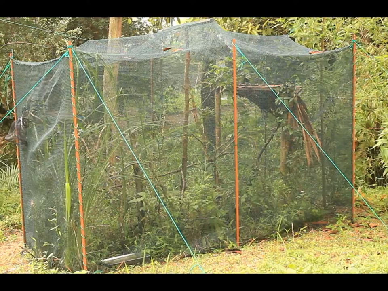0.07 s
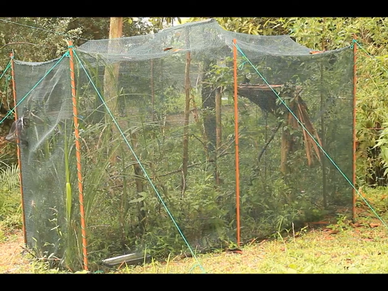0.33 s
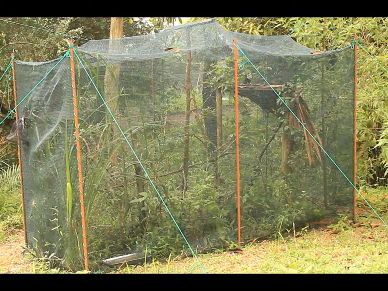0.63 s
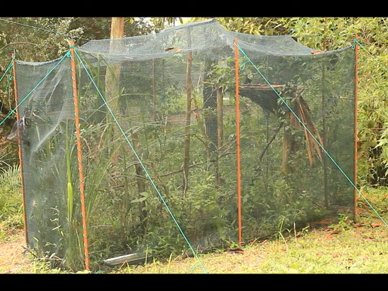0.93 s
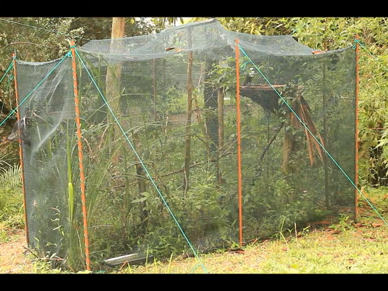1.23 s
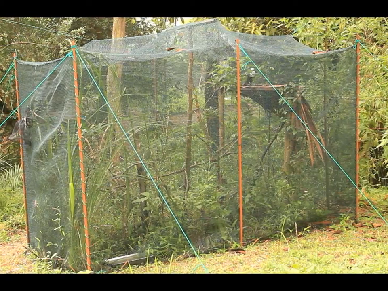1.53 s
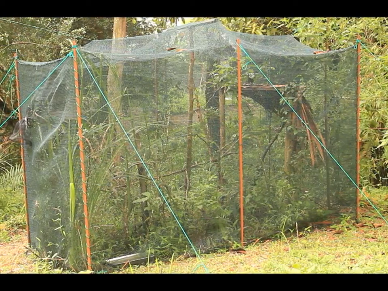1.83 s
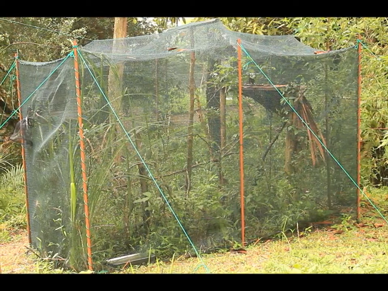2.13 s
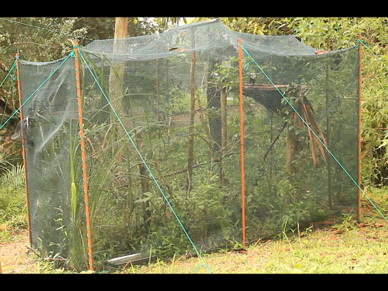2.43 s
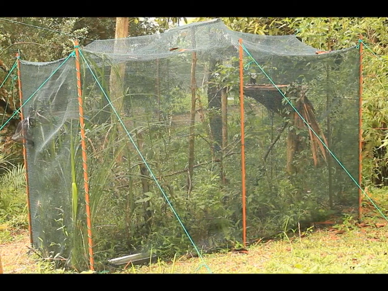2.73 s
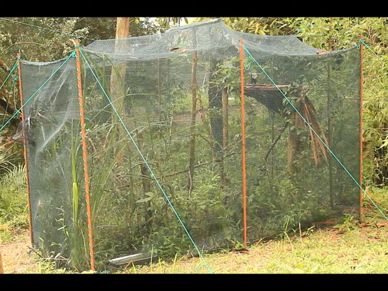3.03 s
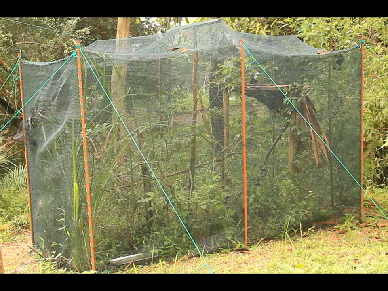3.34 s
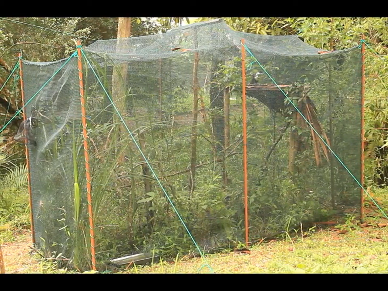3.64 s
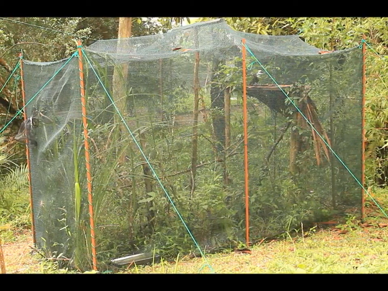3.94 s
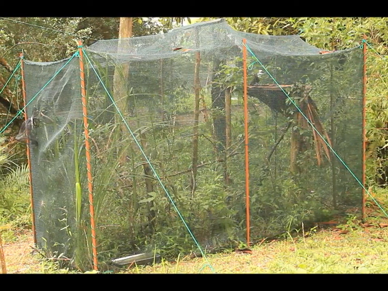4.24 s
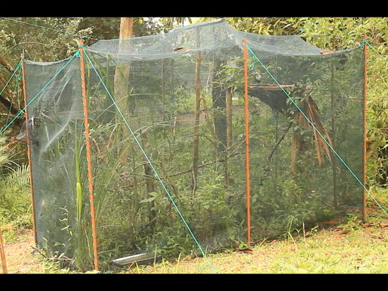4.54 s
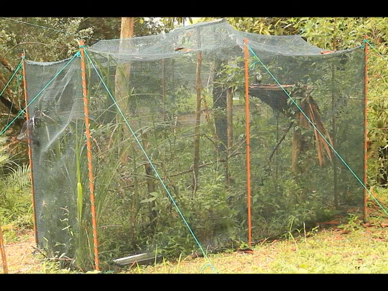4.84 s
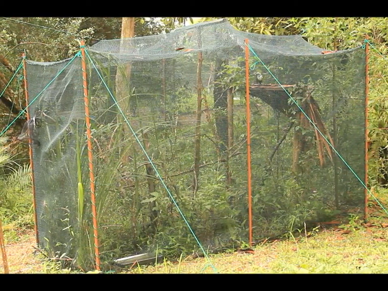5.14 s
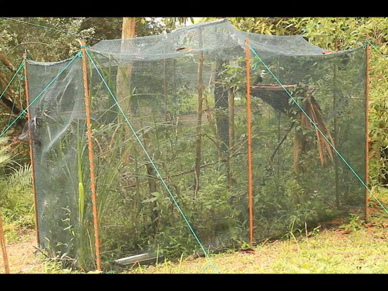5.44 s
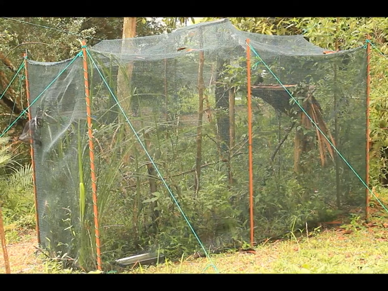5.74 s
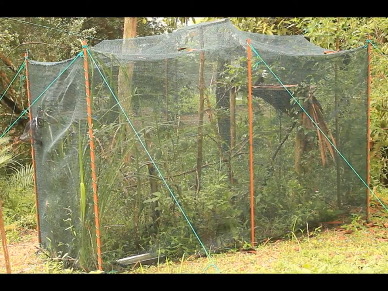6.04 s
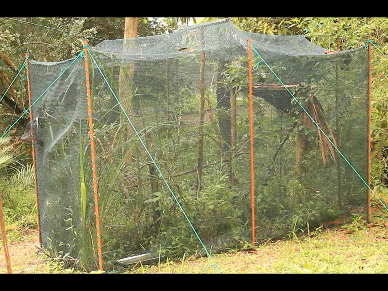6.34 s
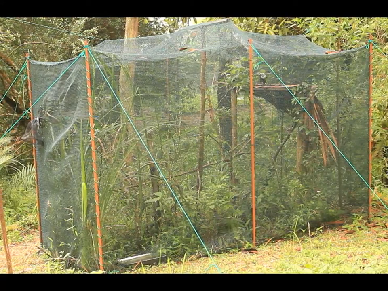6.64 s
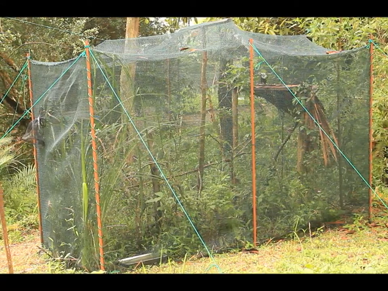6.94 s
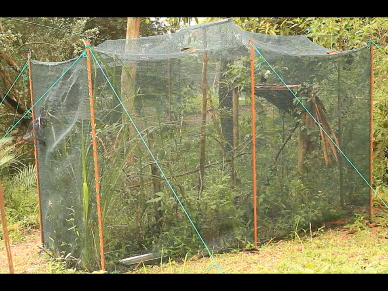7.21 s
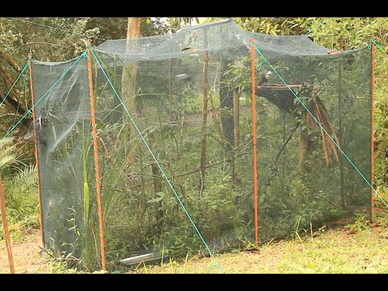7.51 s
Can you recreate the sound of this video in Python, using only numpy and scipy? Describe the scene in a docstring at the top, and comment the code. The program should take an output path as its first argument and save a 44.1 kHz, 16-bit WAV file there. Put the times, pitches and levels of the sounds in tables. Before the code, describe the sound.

Harsh, rattling bird chatter comes in repeated bursts from a few metres off, soon joined by loud runs of short, clear whistles. Partway through, one bird squawks hoarsely, then the chatter and whistles pick up again. Faint nasal mews come from farther birds. Behind it all are a thin insect hiss, a soft rush of air and a faint low hum.

```python
"""In a netted garden aviary, laughingthrushes call a few metres away.
Each bird makes a tone in its voice box (the syrinx), and its throat picks which harmonics are loud.
Rattling trains of harsh, falling notes overlap loud, short whistles; farther birds mew.
There are two hoarse squawks, and a soft thump as a bird shifts on its perch.
The ground and bushes throw the calls back, over soft air noise, an insect hiss and a low hum."""
import sys
import numpy as np
from scipy import signal
from scipy.fft import rfft, irfft, next_fast_len
from scipy.io import wavfile

SR = 44100
rng = np.random.default_rng(int(sys.argv[2]) if len(sys.argv) > 2 else 0)


def put_to_file(sound):
    """Save the sound as 16-bit audio at rate SR, in the file named by the first command-line argument."""
    columns = np.atleast_2d(sound).T  # one column per channel
    safe = np.clip(columns, -1, 1)
    whole_steps = np.round(safe * 32767)
    wavfile.write(sys.argv[1], SR, whole_steps.astype(np.int16))


N = 342657


def gain_of(db):
    """Turns decibels into a number to multiply a sound by."""
    return 10 ** (np.asarray(db) / 20)


def unit_level(x):
    """Scales a signal so its average size (rms) is 1."""
    return x / np.sqrt(np.mean(x ** 2) + 1e-20)


def look_up(table, hz):
    """Reads a table at any frequency, joining its rows by straight lines on a log scale."""
    row_hz, values = np.transpose(table)
    return np.interp(np.log(hz + 1), np.log(row_hz + 1), values)


def add(mix, start_s, sound):
    """Adds a sound into the mix at the given time."""
    part = mix[max(round(start_s * SR), 0):][:len(sound)]
    part += sound[:len(part)]


def drift(rate_hz):
    """A random wobble of size 1, moving up to about the given rate."""
    size = next_fast_len(N)
    smoothing = np.exp(-(np.fft.rfftfreq(size, 1 / SR) / rate_hz) ** 2)
    return unit_level(irfft(rfft(rng.standard_normal(size)) * smoothing, size)[:N])


def noise(spectrum):
    """Noise of size 1, coloured by rows of frequency_hz, level_db."""
    colour = gain_of(look_up(spectrum, np.fft.rfftfreq(N, 1 / SR)))
    return unit_level(irfft(rfft(rng.standard_normal(N)) * colour, N))


def progress(length_s):
    """Runs from 0 to 1 over a note; called u below."""
    return np.arange(0, 1, 1 / (length_s * SR))


def during(curve, start_s, u):
    """The part of a long curve that lies under a note."""
    return curve.take(round(start_s * SR) + np.arange(len(u)), mode="wrap")


def beats(first_s, last_s, notes, slowing):
    """Each note's time and place (0 to 1) in a run whose last gap is `slowing` times its first."""
    places = np.linspace(0, 1, notes)
    steps = np.cumsum(np.r_[0, np.geomspace(1, slowing, notes - 1)])
    return zip(first_s + (last_s - first_s) * steps / max(steps[-1], 1), places)


def contour(values, place):
    """A line through start and end, or an arc through start, middle and end."""
    curve = np.polyfit(np.linspace(0, 1, len(values)), values, len(values) - 1)
    return np.polyval(curve, place)


def harmonics(count):
    """The whole-number multiples of a pitch, as a column; called k below."""
    return np.arange(1, count + 1)[:, None]


def syrinx(hz, k, db):
    """A bird's voice box: harmonics of a gliding pitch, each with its own level and a random phase."""
    cycles = k * np.cumsum(hz) / SR + rng.random(k.shape)
    return (gain_of(db) * (k * hz < SR / 2) * np.sin(2 * np.pi * cycles)).sum(0)


# The colour of outdoor air noise: frequency_hz, level_db
AIR_SPECTRUM = [(20, -36), (45, -15), (65, -6.5), (95, -4.5), (150, 1.5), (240, -4.5), (750, -2.5),
                (1500, -2.5), (3000, -11.5), (5000, -25.5), (16000, -32)]


def air(level_db=-44.5, waver_db=1.1):
    """Outdoor air makes a soft, low rush that gently rises and falls."""
    return noise(AIR_SPECTRUM) * gain_of(level_db + waver_db * drift(4.8))


# The colour of the insect chorus: frequency_hz, level_db
INSECT_SPECTRUM = [(5200, -25.5), (6000, -11.5), (6400, -10.5), (6850, 2), (7150, -2), (7500, -19),
                   (8100, -8), (8800, -18.5), (10500, -47)]


def insects(level_db=-45.5, flutter_db=1):
    """Insects blend into a high, narrow hiss that flutters quickly."""
    return noise(INSECT_SPECTRUM) * gain_of(level_db + flutter_db * drift(40))


# How loud the distant hum is over time: time_s, level_db
HUM_LEVELS = [(0, -63), (1, -61), (1.6, -53.5), (3.201, -49.5), (3.6, -69), (7.7, -59)]


def hum(low_hz=176.6, high_hz=318, high_db=-7):
    """Two low, distant tones waver in pitch and loudness."""
    out = np.zeros(N)
    for hz, db in [(low_hz, 0), (high_hz, high_db)]:
        cycles = np.cumsum(hz + 4 * drift(14.2)) / SR
        out += gain_of(db) * np.sin(2 * np.pi * cycles) * (1 + .33 * drift(14.6))
    return out * gain_of(np.interp(np.arange(N) / SR, *np.transpose(HUM_LEVELS)))


# How the throat boosts or weakens a chatter note: frequency_hz, gain_db
CHATTER_THROAT = [(700, -13), (1100, -8.5), (1700, -1), (2400, 4), (3400, -0.5), (4300, 3), (5200, -5),
                  (6500, -5), (8200, -16), (9800, -14), (11500, -23.5), (13300, -19.5), (16000, -32)]
# Treble gained as the chattering birds turn towards the listener: time_s, gain_db
FACING_TREBLE = [(0, 2.5), (1.2, 2.5), (2.4, -3), (3.5, -5.5), (4.6, 2.5), (6.2, 1.5), (6.8, 1), (7.5, 0)]
# Trains of harsh notes: first_s, last_s, note_count, slowing_ratio, length_s, pitch_hz, scoop_share,
# fall_share, second_harmonic_db, other_harmonics_db, through_leaves_share
# Triples give a train's start, middle and end. Scoop (the opening rise) and fall are shares of the pitch.
CHATTER_TRAINS = [(.0068, 0.379, 8, 1.27, 0.022, (1800, 1740, 1700), 0.054, 0.83, (-32, -30, -31.5),
                  (-30, -29, -28), 0.077), (0.428, 1.072, 14, 1.03, 0.021, (1820, 1680, 1330),
                  -.03, 0.41, (-25.5, -31, -32), (-25, -31, -26), 0.11),
                  (.335, 0.736, 8, 1.12, 0.022, (1630, 1650, 1370), -0.012, 0.58, (-36, -24.5, -17.5),
                  (-35, -30, -26), .25), (1.233, 1.461, 7, 1.05, 0.027, (1500, 1590, 1430),
                  -0.0024, 0.46, (-31, -29, -33), (-31.5, -26.5, -29), 0.57),
                  (1.504, 1.6863, 5, 1.28, .027, (1450, 1790, 1830), .16, .52, (-32, -26, -22),
                  (-26, -25, -26), .4), (1.734, 1.968, 5, 1.21, 0.03, (1800, 1770, 1530),
                  .12, 0.59, (-28, -22.5, -31), (-27.5, -27.5, -29), 0.26),
                  (2.0623, 2.357, 7, 1.62, .028, (1330, 1800, 1800), 0.077, 0.65, (-26, -19, -17),
                  (-30.5, -20.5, -31), 0.39), (3.391, 3.716, 7, 1.15, 0.024, (1330, 1230, 1240),
                  -0.015, 0.37, (-21, -20.5, -14.5), (-34.5, -24, -31), 0.14),
                  (3.476, 3.631, 4, 1.3, 0.028, (1740, 1840, 1730), .14, 0.42, (-15.5, -16, -14.5),
                  (-25.5, -27, -29), 0.45), (3.751, 3.781, 2, 1, 0.025, (1470, 1480, 1600),
                  .08, .45, (-17, -9, -12.5), (-28.5, -28, -26), 0.36),
                  (3.793, 4.233, 10, 1.31, 0.028, (1490, 1650, 1650), -0.058, .62, (-23, -14, -24),
                  (-23, -26, -42), .1), (3.955, 4.049, 3, 1.47, 0.035, (1520, 1580, 1480),
                  0.093, .5, (-16.5, -16.5, -18), (-30, -28, -33), 0.32),
                  (4.276, 4.445, 5, 1.3, .03, (1580, 1420, 1250), -0.049, 0.43, (-23, -31.5, -25),
                  (-20.5, -26, -31), .3), (4.6186, 4.681, 2, 1, 0.027, (1170, 1200, 1020),
                  .08, 0.37, (-18, -15, -20), (-44, -45, -48), .1),
                  (5.139, 5.219, 3, 1, 0.019, (1364, 1392, 1264), -0.036, .48, (-35, -34, -35),
                  (-33.5, -30.5, -31.5), 0.18), (5.261, 5.573, 7, 1.43, .023, (1650, 1770, 1650),
                  0.027, 0.77, (-26, -23.5, -28), (-31, -25.5, -29), 0.13),
                  (5.654, 5.7974, 4, 1.12, 0.022, (1380, 1760, 1820), 0.035, 0.6, (-26, -29.5, -23),
                  (-29.5, -27, -25.5), .1), (6.346, 6.561, 6, 1.5, 0.024, (1320, 1530, 1300),
                  -0.016, 0.72, (-27.5, -28, -28.5), (-36, -26.5, -32), .15),
                  (6.591, 6.745, 5, 1.27, 0.029, (1700, 1790, 2000), .18, .5, (-33, -27, -22.5),
                  (-31, -26, -26), .45), (6.773, 7.155, 9, 1.26, .029, (1460, 1460, 1560),
                  -0.053, 0.71, (-22, -23.5, -26), (-23, -26, -27.5), 0.13),
                  (6.798, 7.022, 4, 1.23, 0.035, (1800, 1560, 1400), 0.084, .62, (-27, -25, -25),
                  (-27, -28, -28), .7), (7.1884, 7.507, 7, 1.51, .026, (1180, 1640, 1320),
                  0.047, 0.76, (-18.5, -17.5, -17), (-32.5, -30, -37), 0.1)]


def chatter(hold=.35, rasp=.016, turn_db=1.5, squeak_db=8, uneven_db=4):
    """Each note holds its pitch briefly, then plunges, sweeping its harmonics through the throat."""
    out, behind_leaves = np.zeros(N), np.zeros(N)
    shake, k = drift(990), harmonics(14)
    for *timing, length_s, pitches, scoop, fall, second_dbs, other_dbs, hidden in CHATTER_TRAINS:
        for start_s, place in beats(*timing):
            # no two notes are quite alike
            sharp, steep, loud, beak, turn = rng.standard_normal(5)
            pitch_hz = contour(pitches, place) * (1 + .01207 * sharp)
            plunge = min(fall * (1 + .1177 * steep), 1)
            second_db = contour(second_dbs, place) + .63 * loud
            others_db = contour(other_dbs, place) + .63 * loud
            u = progress(length_s)
            early, late = np.maximum(1 - u / hold, 0), np.maximum(u - hold, 0) / (1 - hold)
            glide = 1 - scoop * early ** 2 - plunge * late ** 2
            hz = pitch_hz * glide * (1 + rasp * during(shake, start_s, u))
            # the beak opens differently on each note, and it aims the treble
            db = np.where(k == 2, second_db, others_db)
            db = db + look_up(CHATTER_THROAT, k * hz * np.exp(.057 * beak))
            db += uneven_db * rng.uniform(-1.01, 1, k.shape) * (k > 2)
            facing_db = np.interp(start_s, *np.transpose(FACING_TREBLE)) + turn_db * turn
            db += facing_db * np.interp(k * hz, [4000, 11000], [0, 1])
            # high, scooped notes at moderate effort squeak on their third harmonic
            pressed = np.interp(scoop, [.05, .16], [0, 1]) * np.interp(second_db, [-22, -18], [1, 0])
            db += squeak_db * pressed * np.interp(hz, [1580, 1720], [0, 1]) * (k == 3)
            swell = np.interp(u, [0, .25, .55, .8, 1], [0, .44, 1, .85, 0])
            note = swell * syrinx(hz, k, db)
            add_with_echoes(out, start_s, np.sqrt(1 - hidden) * note)
            add(behind_leaves, start_s, np.sqrt(hidden) * note)
    return out + scatter(behind_leaves, thicket, paths=4)


# Hard echoes from the ground and perches: delay_s, gain
GROUND_ECHOES = [(.0032, 0.37), (.0058, 0.24), (.0083, 0.39), (0.0125, 0.23), (.016, 0.11)]


def add_with_echoes(out, start_s, note, echo_db=0, wander=.12):
    """Adds a note and its echoes, whose paths shift as the bird bobs and turns."""
    add(out, start_s, note)
    for delay_s, gain in GROUND_ECHOES:
        shifted_s = delay_s * (1 + wander * rng.uniform(-1, 1))
        add(out, start_s + shifted_s, gain_of(echo_db) * gain * note)


def scatter(sound, make_echo, paths, turn_hz=8.1):
    """As the birds turn, their sound drifts between several paths through the leaves."""
    shares = np.array([drift(turn_hz) for _ in range(paths)])
    shares /= np.linalg.norm(shares, axis=0)
    return sum(signal.oaconvolve(sound * share, make_echo())[:N] for share in shares)


def thicket(fade_s=.075):
    """Leaves right around a bird smear its call with a short, dense echo."""
    t = np.arange(0, 2 * fade_s, 1 / SR)
    echo = rng.standard_normal(SR)[:len(t)] * gain_of(-60 * t / fade_s)
    return echo / np.linalg.norm(echo)


# How long the echo of the bushes takes to fade by 60 dB: frequency_hz, fade_s
BUSH_FADES = [(500, 1), (2000, 0.62), (4000, 0.73), (8000, 0.89), (15000, 0.37)]


def bushes(near_fade_s=.024, near_gain=.92):
    """Leaves return a quick cloud of tiny echoes, then a tail that dies sooner in the treble."""
    bounces = rng.standard_normal(SR) * (rng.random(SR) < .1) * (np.arange(SR) > .008 * SR)
    hz, t, bands = signal.stft(bounces, SR, nperseg=256)
    tail = gain_of(-60 * t / look_up(BUSH_FADES, hz)[:, None])
    near = near_gain * gain_of(-60 * t / near_fade_s)
    echo = signal.istft(bands * (tail + near), SR, nperseg=256)[1]
    return echo / np.linalg.norm(echo)


# The tone of a whistle: harmonic_number, level_db
WHISTLE_HARMONICS = [(1, -24.5), (2, 1), (3, -23.5), (4, -30.5), (5, -35.5), (6, -37), (13, -40.5)]


def whistle(notes, flick=.4104, flick_s=.01002, jitter=.016, leak_db=16, uneven_db=5, quaver_db=3):
    """The throat is tuned to harmonic 2; a last downward flick slips out of tune and lets others out."""
    out, shake, quaver, k = np.zeros(N), drift(590), drift(160), harmonics(13)
    for start_s, length_s, pitch_hz, fall, level_db, others_db, swell_db, arch in notes:
        u = progress(length_s)
        slip = np.maximum(1 - (1 - u) * length_s / flick_s, 0)
        # an arched note is already low at its end and has less left to drop
        drop = max(flick - arch, 0) * slip ** 1.75
        glide = 1 - fall * (u - .5) - arch * (2 * u - 1) ** 2 - drop
        hz = pitch_hz * glide * (1 + jitter * during(shake, start_s, u))
        swell = np.interp(u, [0, .2, .45, 1], [0, .6, .95, 1]) * gain_of(swell_db * (u - .5))
        release = np.interp(slip, [0, .35, 1], [1, .45, 0])
        falter = gain_of(quaver_db * u * np.minimum(during(quaver, start_s, u), .5))
        colour_db = look_up(WHISTLE_HARMONICS, k) + uneven_db * rng.uniform(-.95, 1, k.shape) * (k > 3)
        tone = syrinx(hz, k, level_db + colour_db + (others_db + leak_db * slip) * (k != 2))
        add_with_echoes(out, start_s, swell * release * falter * tone, echo_db=-9)
    return out


# Runs of whistles: first_s, last_s, note_count, slowing_ratio, length_s, pitch_hz, fall_share,
# level_db, other_harmonics_gain_db, swell_db
# Pairs give a run's start and end; triples add its middle. The loudest tone is an octave above pitch_hz.
WHISTLE_RUNS = [(.797, 1.233, 8, 1.01, .023, (1203, 1114), (.16, 0), (-12.5, -9.5, -7), -3.5, -3.5),
                (1.296, 1.863, 9, 1.08, .034, (1118, 1083), (-.02, -0.067), (-7.5, -8, -14), -4, -3),
                (3.773, 4.031, 5, 1.1, 0.034, (1160, 1100), (.25, 0.302), (-12, -11.5, -13), 1.5, -3),
                (4.1074, 4.363, 5, 1.01, .027, (1090, 1067), (0.14, 0.18), (-6, -6.5, -7.5), -4.5, -4),
                (4.438, 4.578, 3, 1.26, .036, (1055, 1042), (0.214, .17), (-7, -7, -8), -2, -9),
                (4.6562, 4.843, 3, 1.38, .033, (1040, 980), (.2, 0.086), (-8, -9.5, -12.5), -4.5, -11),
                (5.792, 6.209, 7, 1.37, .028, (1155, 1060), (0.11, 0), (-15, -11, -14.5), -.5, -1.5)]


def whistle_runs(stretch=.222, pitch_spread=.0076, arch=-.021):
    """Through a run, a bird's whistles slow down, sink and lengthen."""
    notes = []
    for *timing, length_s, pitches, falls, levels, others_db, swell_db in WHISTLE_RUNS:
        for start_s, place in beats(*timing):
            pitch_hz = contour(pitches, place) * (1 + pitch_spread * rng.standard_normal())
            stretched_s = length_s * (1 + stretch * (place - .5))
            fall, level_db = contour(falls, place), contour(levels, place)
            notes.append((start_s, stretched_s, pitch_hz, fall, level_db, others_db, swell_db, arch))
    return whistle(notes)


# Drawn-out calls: start_s, length_s, start_hz, end_hz, level_db, second_harmonic_gain_db
MEW_CALLS = [(1.501, 0.49, 741, 585, -45.5, -6), (2.418, 0.16, 780, 700, -41.5, -7),
             (4.372, 0.067, 822, 648, -58, 18), (5.068, 0.18, 781, 692, -44.5, 1.5),
             (5.081, .24, 1200, 960, -41.5, -6), (6.229, 0.16, 856, 719, -41.5, 8),
             (6.928, .26, 732, 652, -44.5, -7), (7.487, 0.11, 851, 729, -42.5, 15.5)]


def mews(third_db=-12, jitter=.013):
    """Farther birds draw out soft, nasal, falling notes."""
    out, shake = np.zeros(N), drift(120)
    for start_s, length_s, start_hz, end_hz, level_db, second_db in MEW_CALLS:
        u = progress(length_s)
        hz = (start_hz + (end_hz - start_hz) * u) * (1 + jitter * during(shake, start_s, u))
        tone = syrinx(hz, harmonics(3), level_db + np.array([[0], [second_db], [third_db]]))
        add(out, start_s, np.sin(np.pi * u) ** .5 * tone)
    return out


# Whistles outside the runs: start_s, length_s, pitch_hz, fall_share (below 0 it rises), level_db
SINGLE_WHISTLES = [(1.939, 0.052, 1069, .015, -15.5), (2.022, .049, 1003, 0.2, -14),
                   (2.079, 0.043, 993, -0.061, -13.5), (2.16, 0.034, 1005, 0.034, -13),
                   (2.3153, 0.044, 1080, 0.22, -13.5), (2.3505, 0.056, 988, -.11, -13.5),
                   (2.3894, 0.047, 1001, -0.17, -15.5), (2.4338, .042, 984, 0, -13.5),
                   (2.5254, 0.041, 900, -0.01, -14), (2.6475, 0.037, 940, 0.23, -16),
                   (2.6833, 0.046, 933, -0.13, -15), (2.738, .043, 867, -.2, -17.5),
                   (2.8006, 0.045, 814, -0.18, -23), (2.986, 0.047, 972, 0, -15),
                   (3.0285, 0.041, 961, -.17, -11), (3.071, 0.043, 932, -0.26, -12.5),
                   (3.1408, .035, 911, 0.016, -15.5), (3.2564, .035, 1032, 0.28, -12),
                   (3.3248, 0.019, 1103, 0.53, -15), (4.263, 0.048, 865, .04, -19),
                   (4.372, 0.061, 775, 0.25, -19.5), (6.291, .044, 1030, .1, -24.5),
                   (6.442, 0.037, 903, -0.052, -16.5), (6.501, 0.06, 775, -.12, -24),
                   (7.618, 0.04, 773, -0.12, -30)]


def single_whistles(others_db=-1.5, swell_db=-2.5, arch=.2207):
    """A bird whistles separate notes, each arching up and back down in pitch."""
    return whistle([(*row, others_db, swell_db, arch) for row in SINGLE_WHISTLES])


# How the throat boosts or weakens a squawk: frequency_hz, gain_db
SQUAWK_THROAT = [(900, -12), (1900, -2.5), (2800, 3.5), (3700, -3.5), (4800, -21.5), (7000, -29),
                 (8800, -21), (11000, -47)]
# Hoarse calls: start_s, length_s, pitch_hz, level_db
SQUAWK_CALLS = [(2.885, .125, 950, -25), (5.065, .075, 900, -40)]


def squawks(arch=.22, jitter=.0716):
    """Low, arched notes whose pitch shakes so fast that the harmonics smear."""
    out, shake, k = np.zeros(N), drift(510), harmonics(12)
    for start_s, length_s, pitch_hz, level_db in SQUAWK_CALLS:
        u = progress(length_s)
        hz = pitch_hz * (1 - arch * (2 * u - 1) ** 2) * (1 + jitter * during(shake, start_s, u))
        tone = syrinx(hz, k, level_db + look_up(SQUAWK_THROAT, k * hz))
        add_with_echoes(out, start_s, np.sin(np.pi * u) * tone)
    return out


def wing_thump(start_s=3.11, length_s=.18, level_db=-42):
    """A soft, low puff as a bird shifts on its perch."""
    out, u = np.zeros(N), progress(length_s)
    puff = noise([(120, -22), (330, 8), (900, -2), (3000, -39)])
    add(out, start_s, gain_of(level_db) * np.sin(np.pi * u) ** 2 * during(puff, start_s, u))
    return out


def scene():
    """The whistler has a clear path to the listener; the others sit deeper in the cage."""
    harsh = chatter() + squawks()
    clear = whistle_runs() + single_whistles()
    far = mews()
    into_bushes = gain_of(-11) * harsh + gain_of(-12.5) * clear + gain_of(-4) * far
    echoes = scatter(into_bushes, bushes, paths=6)
    return (harsh + clear + far + echoes + wing_thump() + insects() + air() + hum())[None]


def record(dry, cutoff_hz=15800):
    """Trims away the very highest treble."""
    low_pass = signal.firwin(511, cutoff_hz, window=("kaiser", 9), fs=SR)
    return signal.oaconvolve(dry, low_pass[None], "same")


dry = scene()
out = record(dry)
put_to_file(out)
```